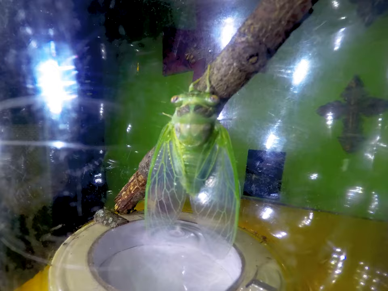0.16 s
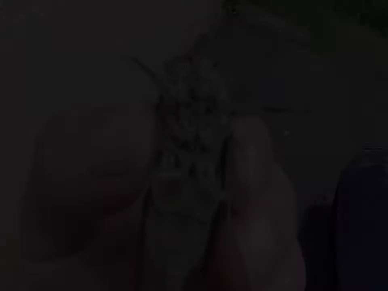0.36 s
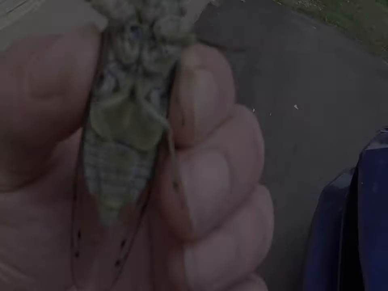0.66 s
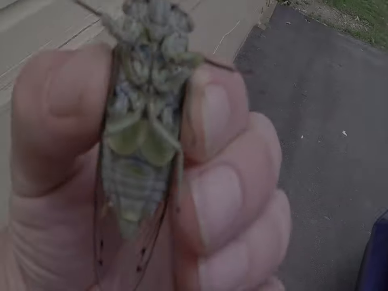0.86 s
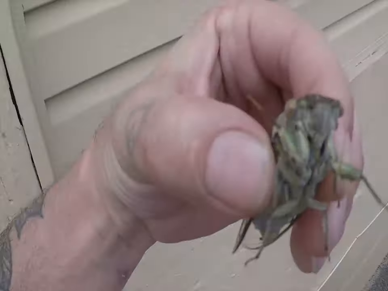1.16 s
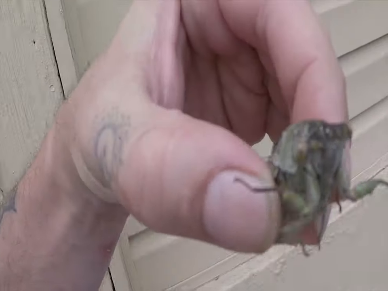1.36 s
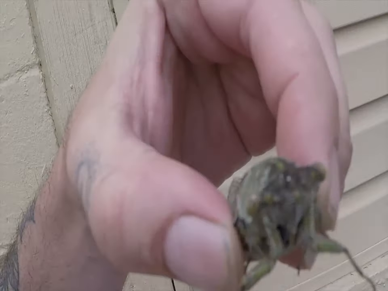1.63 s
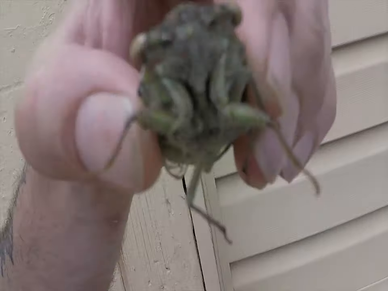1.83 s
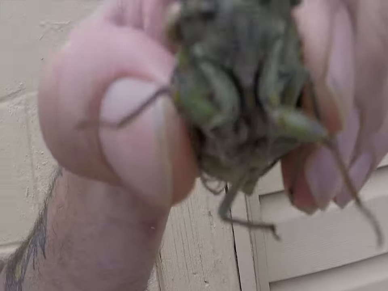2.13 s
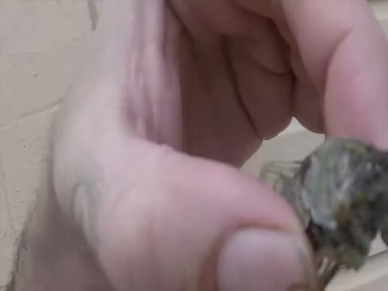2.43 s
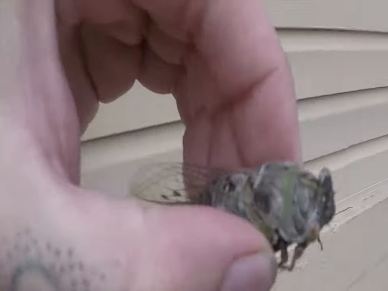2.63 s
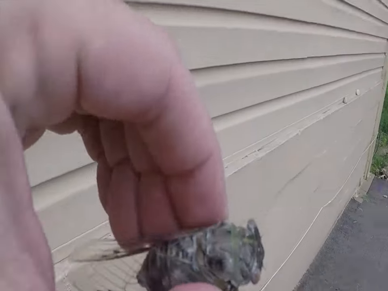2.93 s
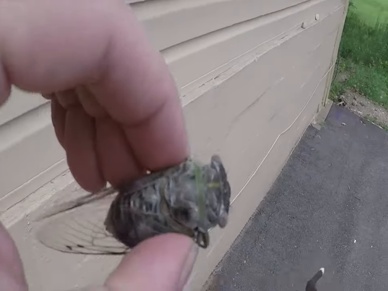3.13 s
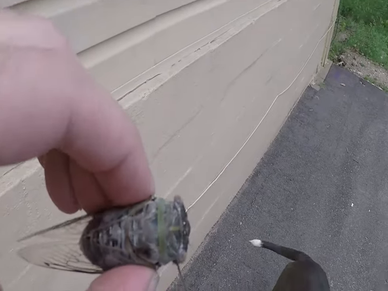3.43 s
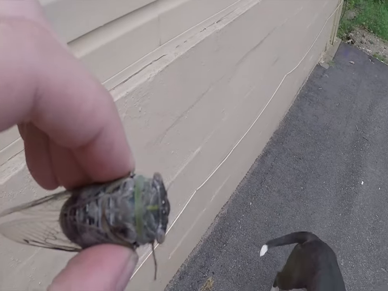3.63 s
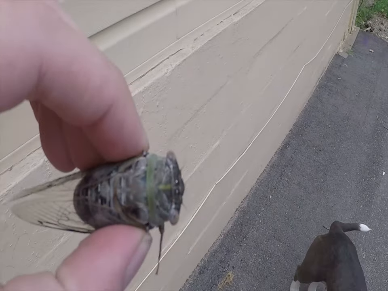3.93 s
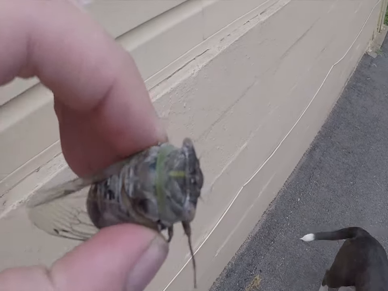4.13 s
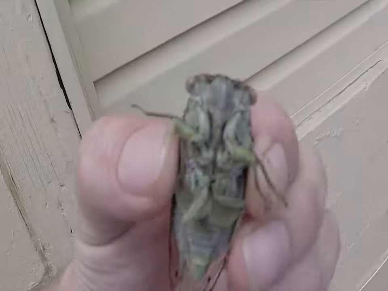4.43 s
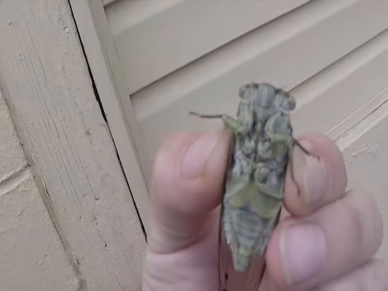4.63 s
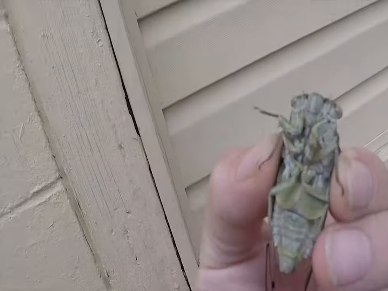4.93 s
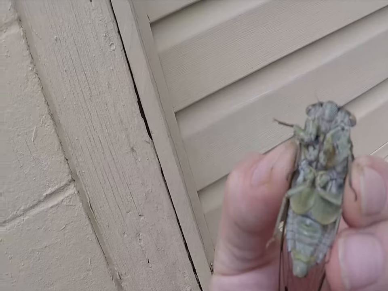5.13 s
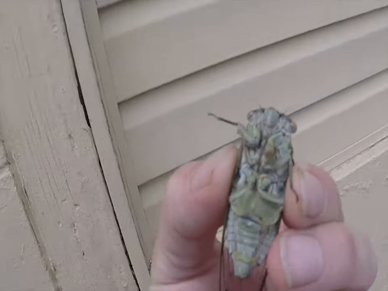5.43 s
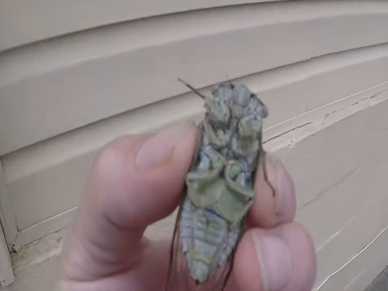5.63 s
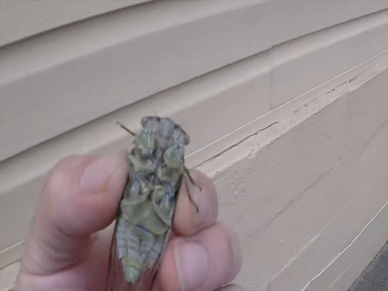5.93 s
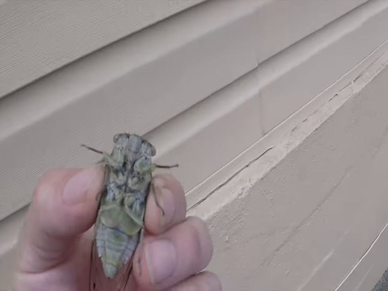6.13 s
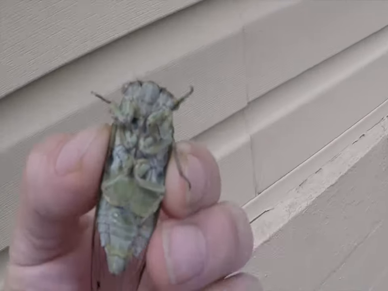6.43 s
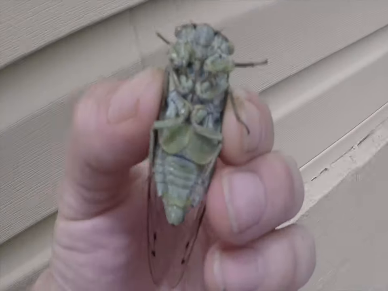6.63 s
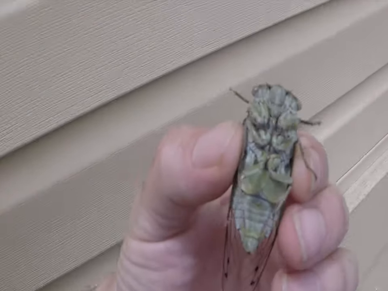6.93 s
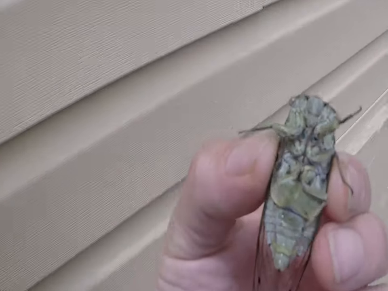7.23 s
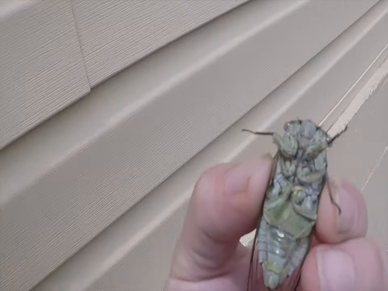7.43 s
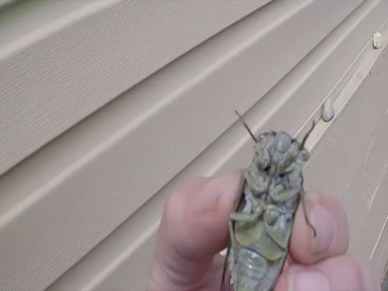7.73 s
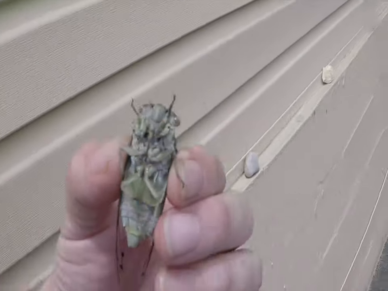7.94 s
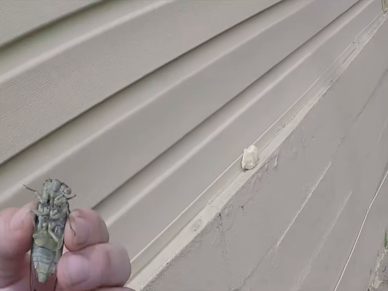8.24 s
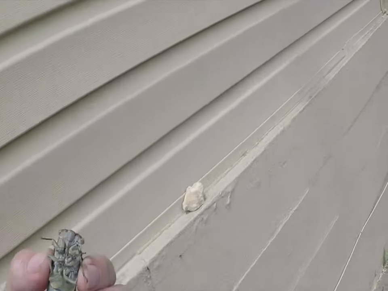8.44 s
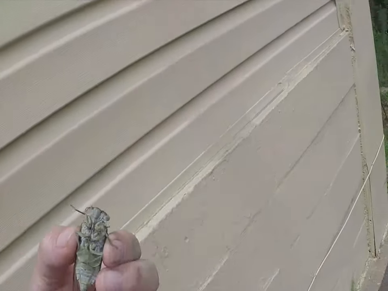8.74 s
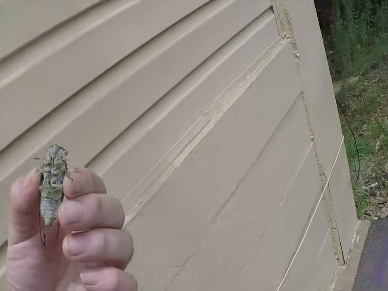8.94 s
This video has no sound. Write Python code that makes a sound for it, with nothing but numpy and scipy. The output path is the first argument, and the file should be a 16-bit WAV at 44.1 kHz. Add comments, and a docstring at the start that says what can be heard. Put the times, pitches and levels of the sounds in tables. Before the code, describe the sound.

Steady motor hum, thin wavering whine and rushing fan air start abruptly outdoors, with early microphone thuds, low gusts and a later scratchy click.

```python
"""An outdoor air-conditioning unit hums beside a house wall: damped motor tones, a thin whine and fan noise.
The sound starts abruptly with three finger bumps on the microphone's case; its level starts low and recovers.
Gusts swell, and a finger catches the case once. The hand-held microphone then nears the wall, whose delayed
echo combs the fan noise; fingers scrape the case as friction bursts, it rings once as they let go, and the
level dips again. To the end the wall distance varies, and gusts press on the microphone as low-pitched noise."""
import sys
import numpy as np
from scipy import signal
from scipy.fft import rfft, irfft, next_fast_len
from scipy.io import wavfile

SR = 44100
rng = np.random.default_rng(int(sys.argv[2]) if len(sys.argv) > 2 else 0)


def int16_out(signal):
    """Quantize to a 16-bit WAV file."""
    q = np.round(np.clip(np.atleast_2d(signal).T, -1, 1) * 32767)
    wavfile.write(sys.argv[1], SR, q.astype(np.int16))


N = 399987
TIME = np.arange(N) / SR   # s
# path of the microphone beside the wall: t/s, distance/m
WALL_DISTANCE = [(.8, 0.3), (2.2, 0.34), (5.9, 0.38), (6.25, 0.283), (6.5, 0.2), (6.9, 0.13), (7.1, 0.277),
                 (7.6, 0.22), (7.92, 0.25), (8.1, 0.29), (8.48, 0.28), (8.7, 0.22), (9.07, 0.24)]
ECHO_NEAR_M = .28   # the echo is full within this distance


def from_db(db):
    """Level to amplitude: 20 dB is a factor of ten."""
    return 10 ** (np.asarray(db) / 20)


def rms_one(x):
    """Normalise to unit mean-square power."""
    return x / np.sqrt(np.mean(x ** 2) + 1e-20)


def in_time(rows):
    """Linear interpolation of each column of a time table at every sample."""
    s, *columns = np.transpose(rows)
    return [np.interp(TIME, s, column) for column in columns]


def at_hz(points, hz):
    """Interpolate a spectrum on a logarithmic frequency axis."""
    f, value = np.transpose(points)
    return np.interp(np.log(hz + 1e-9), np.log(f), value)


def drift(rate):
    """Low-passed randomness of unit rms: a critically damped response, changing about rate times a second."""
    step = 40   # samples between computed values
    r = np.exp(-2 * np.pi * rate * step / SR)
    steps = rng.standard_normal(N // step + 2002)
    slow = signal.lfilter([1], [1, -2 * r, r * r], steps)[2000:]   # settled part
    return np.interp(np.arange(N) / step, np.arange(len(slow)), rms_one(slow))


def colour(x, spectrum):
    """Linear filtering: multiply the Fourier spectrum by a smooth gain in dB."""
    size = next_fast_len(N + SR // 10)
    hz = np.arange(size // 2 + 1) * SR / size
    return irfft(rfft(x, size) * from_db(at_hz(spectrum, hz)), size)[..., :N]


def noise(spectrum):
    """Random turbulence is white noise filtered to a spectrum, here cut below 12 Hz; rms 1."""
    shaped = colour(rng.standard_normal(N), spectrum)
    rumble_cut = signal.butter(2, 12, "high", fs=SR, output="sos")
    return rms_one(signal.sosfilt(rumble_cut, shaped))


def tone(hz, wander_hz, flutter_db, rate=4, offset=0):
    """A rotating part is a sine whose frequency wanders and whose level flutters; rms 1."""
    speed = hz + wander_hz * drift(rate)
    phase = 2 * np.pi * (np.cumsum(speed) / SR + rng.random())
    return rms_one(np.sin(phase + offset) * from_db(flutter_db * drift(6.7)))


def delayed(x, seconds):
    """Propagation delay, fixed or moving: read the sound late."""
    return np.interp((TIME - seconds) * SR, np.arange(N), x)


def at_ports(x):
    """Phase difference between two ports: sound from the left goes round the case to the right one."""
    # lag of the right port behind the left: f/Hz, phase/rad
    port_phase = [(0, 0), (260, 0.21), (500, .27), (780, 0.52), (1030, 1.5), (1800, 2.5), (2350, 5),
                  (3000, 6.5), (4200, 6), (5500, 11)]
    size = next_fast_len(N + SR // 10)
    hz = np.arange(size // 2 + 1) * SR / size
    lag = np.interp(hz, *np.transpose(port_phase))
    right = irfft(rfft(x, size) * np.exp(-1j * lag), size)[:N]
    return np.array([x, right])


def nearness():
    """Decay with distance: 1 close to the wall, fading exponentially to 0 farther out."""
    fade_db_per_m = 172
    wall_m, = in_time(WALL_DISTANCE)
    return from_db(-fade_db_per_m * np.maximum(wall_m - ECHO_NEAR_M, 0))


def wall_echo(x):
    """Reflection: the wall returns the sound after twice its distance, sooner and stronger when near."""
    echo_db, sound_speed = -5.5, 343   # speed in m/s
    wall_m, = in_time(WALL_DISTANCE)
    echo = np.array([delayed(port, 2 * wall_m / sound_speed) for port in x])
    return from_db(echo_db) * nearness() * echo


def wind(eddy_db=-24.0):
    """Pressure fluctuation: large gusts press on both ports alike, while small eddies reach only one."""
    # gusts: peak t/s, half length to 1/e of the dB rise/s, rise above the lull/dB
    gusts = [(1.8, 0.99, 11.5), (2.55, .2, 1.5), (5.0, 0.49, 5.5), (5.75, 0.37, 8.5), (6.85, 0.38, 6),
             (7.9, 0.29, 9), (8.45, 0.14, 10), (8.9, 0.18, 3.5)]
    # relative spectrum of the buffeting: f/Hz, level per Hz/dB
    buffet = [(12, 16.5), (20, 5), (32, 15), (50, 7), (90, 2), (200, -48), (1500, -110)]
    lull_db, gustiness_db = -26, 0.5
    gust_db = sum(db * np.exp(-((TIME - s) / half) ** 2) for s, half, db in gusts)
    eddies = np.array([noise(buffet) for port in range(2)])
    strength = from_db(lull_db + gust_db + gustiness_db * drift(3.9))
    return strength * (noise(buffet) + from_db(eddy_db) * eddies)


def bumps(thud_hz=110, thud_s=0.0046, tick_hz=1050, tick_s=0.00042, tick_db=-3.5, top_hz=2600):
    """Impact on a damped body: a short tick and a thud of the case, both softened by the skin."""
    # soft finger bumps: t/s, level/dB
    touches = [(0.8533, -4), (1.0371, -1.5), (1.1348, -3.5)]
    out = np.zeros(N)
    for s, db in touches:
        age = np.clip(TIME - s, 0, .1)
        thud = np.sin(2 * np.pi * thud_hz * age) * np.exp(-age / thud_s)
        tick = np.sin(2 * np.pi * tick_hz * age) * np.exp(-age / tick_s)
        out += from_db(db) * (from_db(tick_db) * tick - thud)
    return signal.sosfilt(signal.butter(4, top_hz, fs=SR, output="sos"), out)


def scrape(flex_hz=19, flex_s=0.056, flex_db=-3.5, press_s=6.986):
    """Stick-slip friction: each slip is a decaying noise burst; a pressing finger makes the case flex slowly."""
    # fingers catching and slipping: t/s, level before the port balance/dB, decay/s, top f/Hz
    catches = [(2.9364, -11, .0016, 2800), (6.9783, -13.5, .0009, 9500), (6.986, -16.5, 0.0015, 10000),
               (6.993, -17.5, .006, 10500), (7.0, -9.5, .0009, 11500), (7.095, -15, .0016, 3500)]
    # relative spectrum of the friction: f/Hz, level per Hz/dB
    friction_colour = [(500, 11), (1500, 5), (2800, 7), (4500, -2.5), (7500, -1.5), (10500, -12),
                       (15000, -22)]
    friction = np.array([noise(friction_colour) for port in range(2)])
    slips = 0
    for s, db, decay, top_hz in catches:
        age = np.clip(TIME - s, 0, .1)
        force = from_db(db) * (TIME >= s) * np.exp(-age / decay)
        softening = signal.butter(2, top_hz, fs=SR, output="sos")
        slips = slips + signal.sosfilt(softening, force * friction + 1e-18)
    age = np.maximum(TIME - press_s, 0)
    flex = -from_db(flex_db) * np.sin(2 * np.pi * flex_hz * age) * np.exp(-age / flex_s)
    return slips * from_db([[-3.0], [3.0]]) + flex   # slips are stronger at the right port


def snap(start_s=7.0005, level_db=-11.5, ring_hz=2650, decay_s=.0008):
    """Free vibration: the case rings once, briefly, as the last slip lets it snap back."""
    age = np.clip(TIME - start_s, 0, .1)
    return from_db(level_db) * np.sin(2 * np.pi * ring_hz * age) * np.exp(-age / decay_s)


def whine(scatter_db=-15, scatter_width_hz=45, trim_db=-1.5):
    """Bearing tones in standing waves: an unsteady sine with a narrow noise halo, and faint whistles."""
    # swell along the microphone's path: t/s, level before trim/dB, left-right difference/dB
    swell = [(0.85, -39, -10.0), (1.08, -29, 2.5), (1.2, -40, -1), (1.33, -29.5, 11), (1.8, -34, -10),
             (2.22, -40, 0), (2.38, -29, -1.5), (2.95, -29.5, 0.0), (3.68, -34.5, -2), (3.85, -32, -2),
             (4.55, -32, -4), (5.4, -41, -14), (6.0, -31, 3), (6.65, -39.5, 3), (7.25, -40.5, 2),
             (7.73, -33, 6.0), (7.9, -37, 6.0), (8.03, -35, 11.0), (8.2, -40.5, 2.5), (8.4, -33, 4),
             (8.6, -39.5, 9), (9.05, -37, 5)]
    # thin partials, before they follow the swell: f/Hz, level/dB
    whistles = [(2066, -52), (2296, -60), (2407, -51.5), (2832, -50), (2983, -53.5)]
    whine_hz, whine_phase_rad, whistle_phase_rad = 2360, 2.08, 1.2   # phases between the ports
    beat_db, beats_per_s = 3.5, 11   # wavering close to the wall
    follow, mean_db = 0.4, -35   # share of the swell about this level that the whistles take on
    whine_db, pan_db = in_time(swell)

    port_offset = whine_phase_rad * np.array([[-.5], [.5]])
    direct = tone(whine_hz, wander_hz=3.75, flutter_db=1.0, rate=14.2, offset=port_offset)
    direct = direct * from_db(beat_db * nearness() * (drift(beats_per_s) + 0.5))

    edges = [whine_hz - scatter_width_hz / 2, whine_hz + scatter_width_hz / 2]
    band = signal.butter(2, edges, "band", fs=SR, output="sos")
    halo = rms_one(signal.sosfilt(band, rng.standard_normal((2, N))))   # independent at each port

    pan = from_db(np.array([pan_db, -pan_db]) / 2)
    pan = pan / np.sqrt(np.mean(pan ** 2, axis=0))   # keeps the power of the two ports together
    port_offset = whistle_phase_rad * np.array([[.5], [-.5]])
    faint = sum(from_db(db) * tone(hz, wander_hz=3.57, flutter_db=2.0, rate=12.3, offset=port_offset)
                for hz, db in whistles)
    main = (direct + from_db(scatter_db) * halo) * pan * from_db(whine_db + trim_db)
    return main + faint * from_db(follow * (whine_db - mean_db))


def fan(rush_db=-16.5, hiss_db=-28.0, churn_db=0.49):
    """Comb filtering: direct rush and diffuse hiss meet their wall echo, the comb rising as the wall nears."""
    # relative spectrum of the rush straight from the fan: f/Hz, level per Hz/dB
    rush_colour = [(20, 0), (45, -12.5), (70, -7), (120, -5.5), (200, -4), (320, -7.5), (480, -12),
                   (650, -20.5), (900, -25), (1250, -27.5), (1650, -26), (2250, -38.5), (3400, -37),
                   (5500, -48.5)]
    # relative spectrum of the hiss from all around: f/Hz, level per Hz/dB
    hiss_colour = [(30, 7), (150, -1), (450, -6), (800, -5.5), (1050, -1.5), (1250, -11.5), (1620, -3.5),
                   (2200, -14.5), (3400, -19), (4800, -18), (6500, -13.5), (8300, -21.5), (10200, -26.5),
                   (11500, -46), (14500, -48.5)]
    # balance of the hiss: f/Hz, left-right difference/dB
    hiss_balance = [(60, 3.5), (110, -7), (190, 10), (340, -4.5), (600, 3), (1070, 4.5), (1900, 8),
                    (3370, 3.5), (5990, 1.5), (10600, -4.5)]
    # late change of tint: f/Hz, gain/dB
    late_tint = [(400, 0.5), (640, 1.5), (1000, -1), (1300, -1), (1600, 0.5), (3000, 0.5), (6000, 0)]
    # reflection by the wall, ahead of the echo's own level: f/Hz, gain/dB
    echo_colour = [(250, -10.5), (550, -12.5), (800, 0.5), (1700, -19.5), (4000, -22)]
    tint_from_s, tint_over_s = 6.7, 0.61

    rush = noise(rush_colour) * from_db(churn_db * drift(10.6))
    rush = signal.sosfilt(signal.butter(2, 6500, fs=SR, output="sos"), rush)
    hiss = []
    for side in (1, -1):   # left, right
        balance = [(hz, side * db / 2) for hz, db in hiss_balance]
        hiss.append(colour(noise(hiss_colour), balance))
    air = from_db(rush_db) * at_ports(rush) + from_db(hiss_db) * np.array(hiss)

    tinted = np.clip((TIME - tint_from_s) / tint_over_s, 0, 1)
    air = (1 - tinted) * air + tinted * colour(air, late_tint)
    return air + wall_echo(colour(air, echo_colour))


def hum(high_db=0.5, throb_db=-4.0):
    """Periodic rotation makes line spectra: two strong compressor tones over weaker orders of the motor."""
    # upper tone, which swells near the wall: t/s, level before high_db/dB
    high_swell = [(0.85, -22.5), (0.95, -20.5), (2.35, -26), (5.35, -24), (6.1, -25.5), (6.75, -19),
                  (7.3, -28), (7.75, -21), (8.8, -22.5), (9.05, -29)]
    # motor orders swelling from place to place, before throb_db: t/s, second level/dB, third level/dB
    throb = [(0.85, -18.5, -23.5), (1.2, -22, -21.5), (1.65, -14.5, -19), (2.0, -21, -26),
             (3.3, -21.0, -33), (3.7, -17.5, -19), (5.75, -21, -24.5), (6.25, -19.5, -17.5),
             (7.1, -21, -19.5), (7.9, -18.5, -17), (9.05, -21.5, -22)]
    # weaker motor tones, away from the wall: f/Hz, level/dB
    motor_tones = [(36.3, -28.5), (145.7, -30), (194.5, -31.5), (206.5, -31.5), (519.8, -38.5),
                   (780, -41.5), (944, -37), (1022, -49.5), (1148, -65), (1300, -48), (1561, -59),
                   (1607, -54.5)]
    motor_hz, low_hz, high_hz = 36.35, 259.9, 458.9
    low_db, low_db_per_m = -17.5, 6   # at ECHO_NEAR_M from the wall; weaker closer in
    near_wall_db = -2.5   # the weaker tones sink into the rush close to the wall

    wall_m, = in_time(WALL_DISTANCE)
    low_level = from_db(low_db + low_db_per_m * (wall_m - ECHO_NEAR_M))
    low = low_level * tone(low_hz, wander_hz=0.31, flutter_db=0.7)
    high_level = from_db(in_time(high_swell)[0] + high_db)
    high = high_level * tone(high_hz, wander_hz=0.53, flutter_db=0.15)
    orders = sum(from_db(db + throb_db) * tone(k * motor_hz, wander_hz=0.89, flutter_db=1.2)
                 for k, db in enumerate(in_time(throb), 2))
    # the higher a weak tone, the more it wanders
    rest = sum(from_db(db) * tone(hz, wander_hz=0.52 + hz / 600, flutter_db=2.5)
               for hz, db in motor_tones)
    tones = low + high + orders + rest * from_db(near_wall_db * nearness())
    return at_ports(tones) * from_db([[.25], [-.25]])   # slightly louder at the left


def recovery():
    """Time-varying gain on the steady sounds: each dip holds, then climbs back, quickly at first."""
    # dips of the level: t/s, depth/dB, hold/s, recovery/s
    dips = [(0.797, 8.5, 0.077, 1.8), (7, 2.5, 0.41, 1.9), (6.994, 5.5, 0.042, 0.054)]
    power = 1.47   # above 1, the climb is steepest at its start
    loss_db = 0
    for s, db, hold, back in dips:
        remaining = np.clip(1 - (TIME - s - hold) / back, 0, 1) ** power
        loss_db = loss_db + db * (TIME >= s) * remaining
    return from_db(-loss_db)


def scene():
    """Superposition of the machine, the breeze and the hand on the microphone."""
    steady = hum() + whine() + fan() + wind()
    return recovery() * steady + bumps() + scrape() + snap()


def record(dry):
    """Gating, clipping and band limiting: silence until the start, peaks clipped, the top cut."""
    start_s, cutoff_hz = .797, 15000
    held = np.clip(dry * (TIME >= start_s), -.95, .95)
    return signal.sosfilt(signal.ellip(10, .1, 90, cutoff_hz, fs=SR, output="sos"), held)


dry = scene()
out = record(dry)
int16_out(out)
```